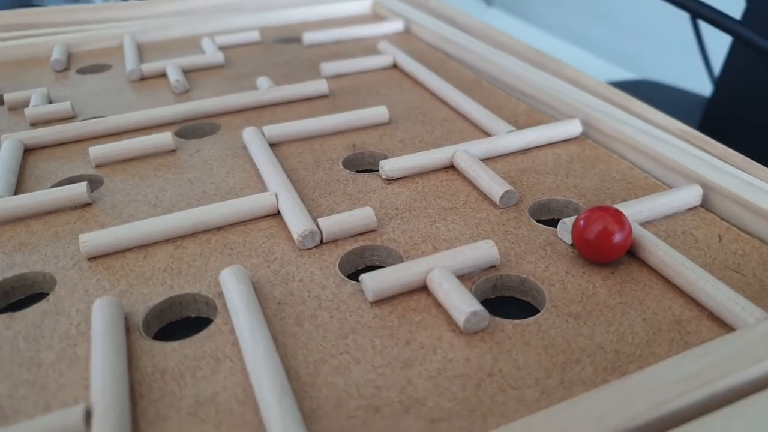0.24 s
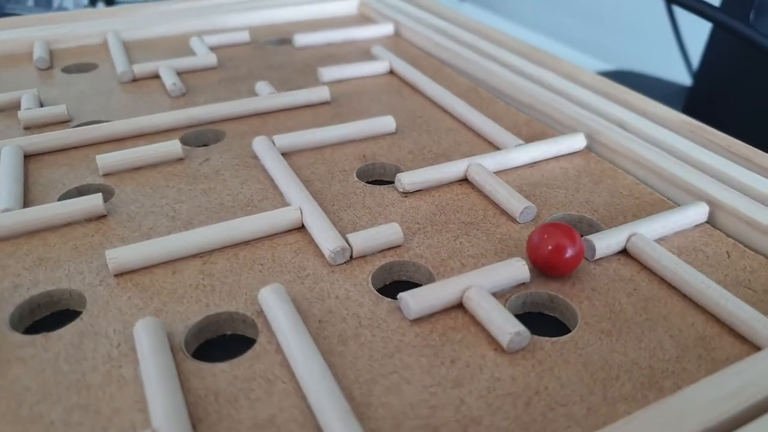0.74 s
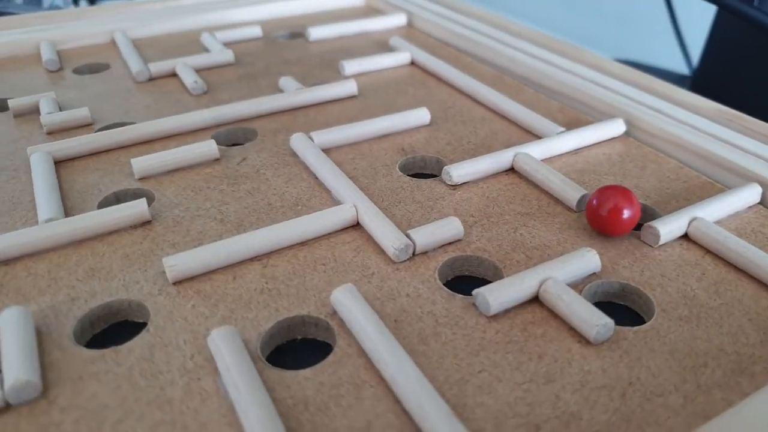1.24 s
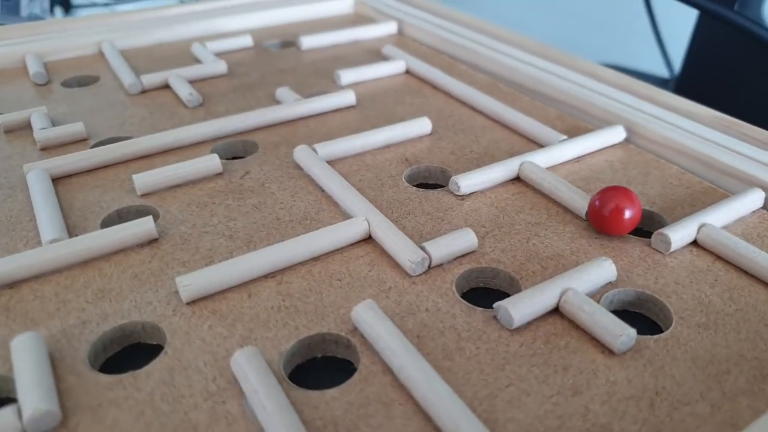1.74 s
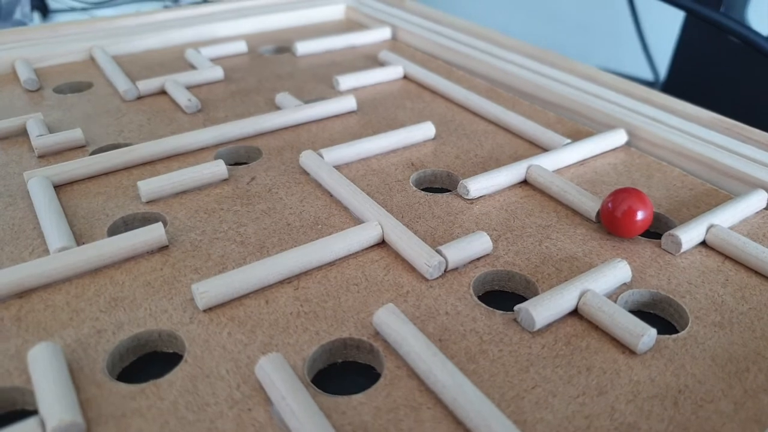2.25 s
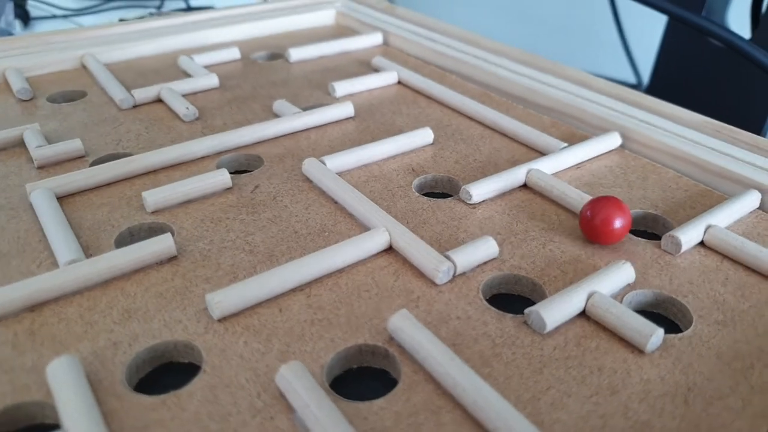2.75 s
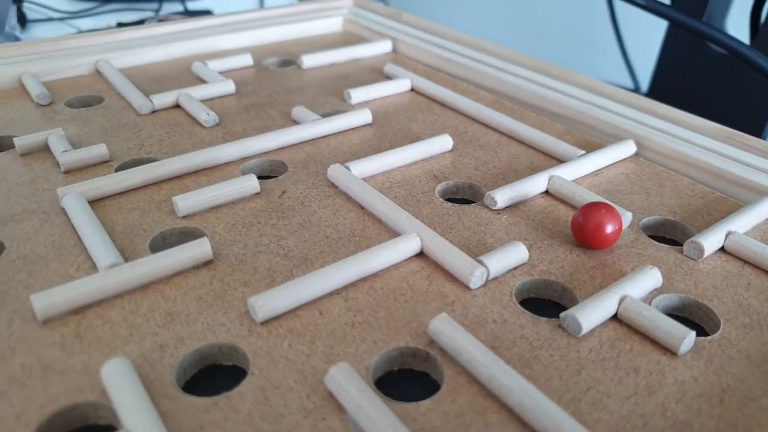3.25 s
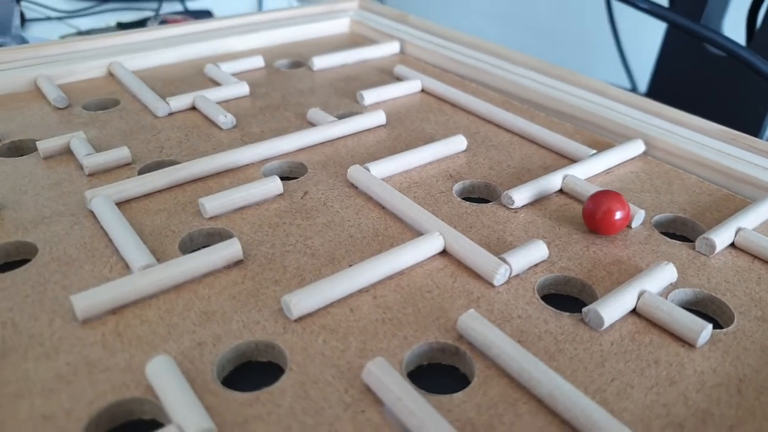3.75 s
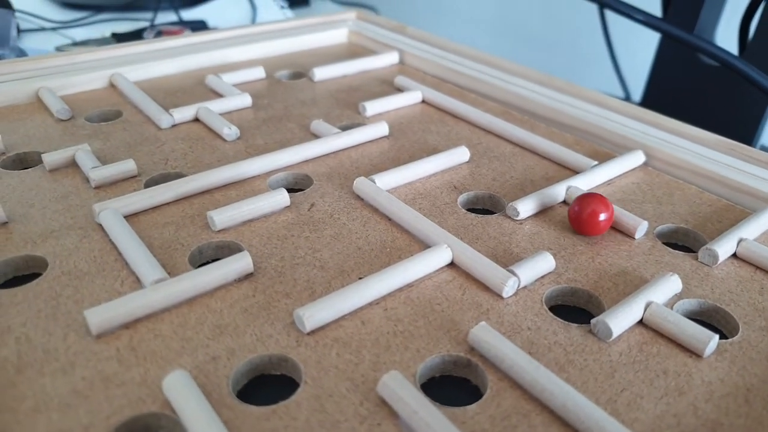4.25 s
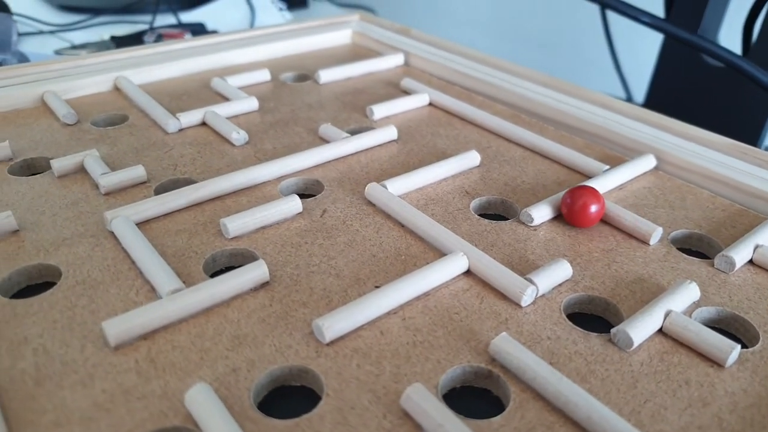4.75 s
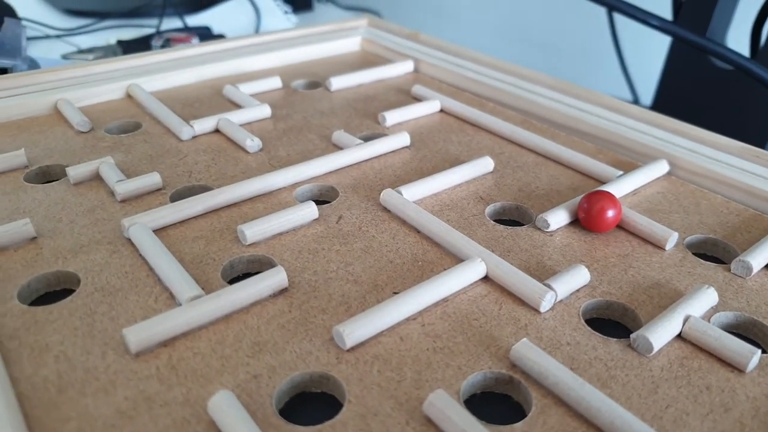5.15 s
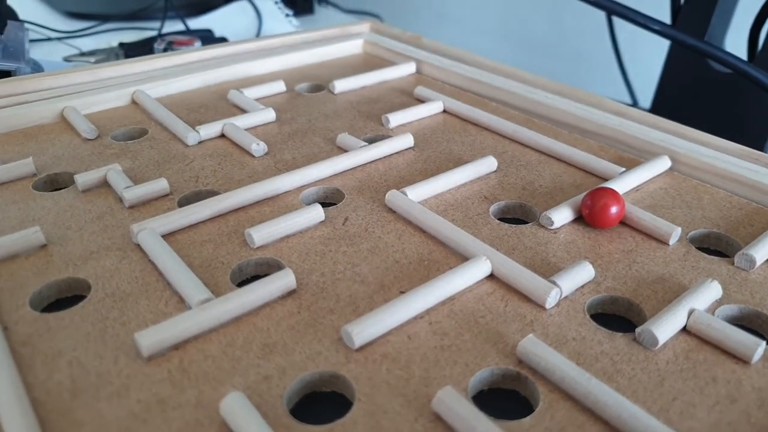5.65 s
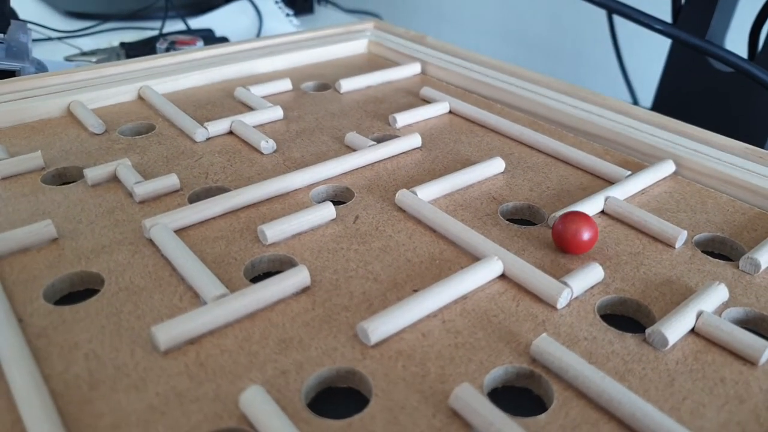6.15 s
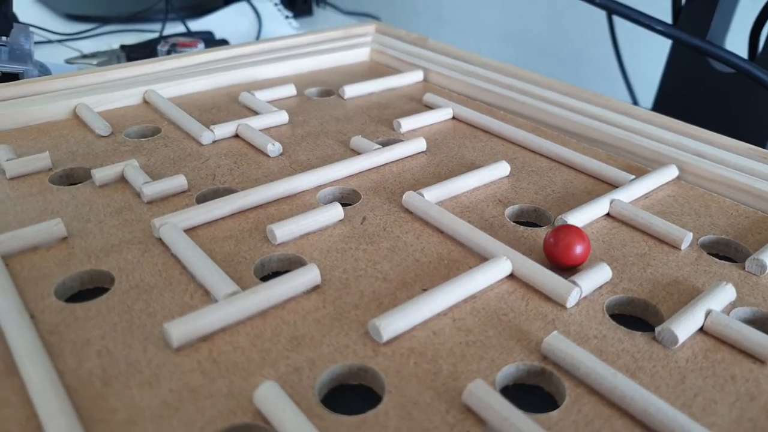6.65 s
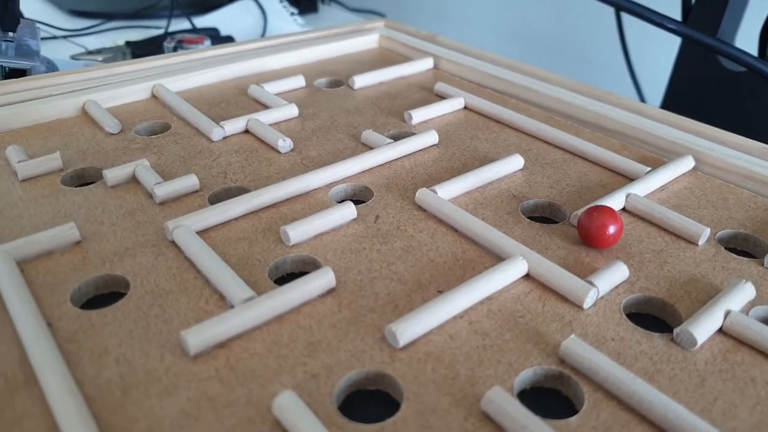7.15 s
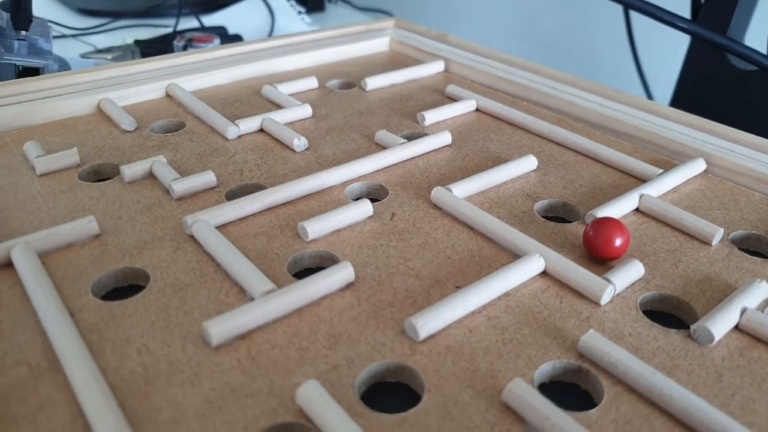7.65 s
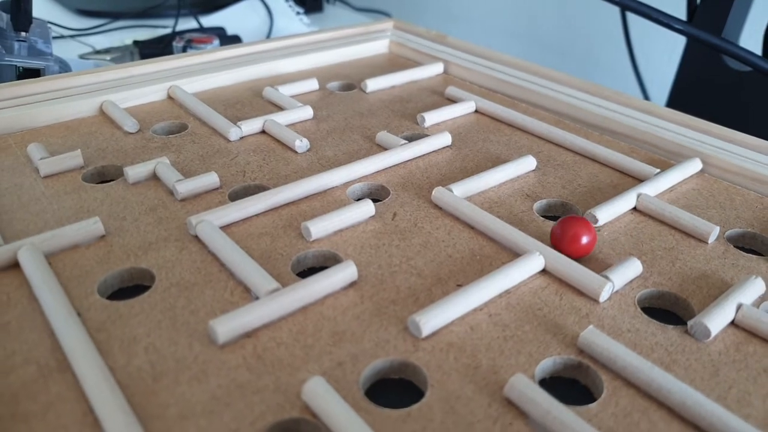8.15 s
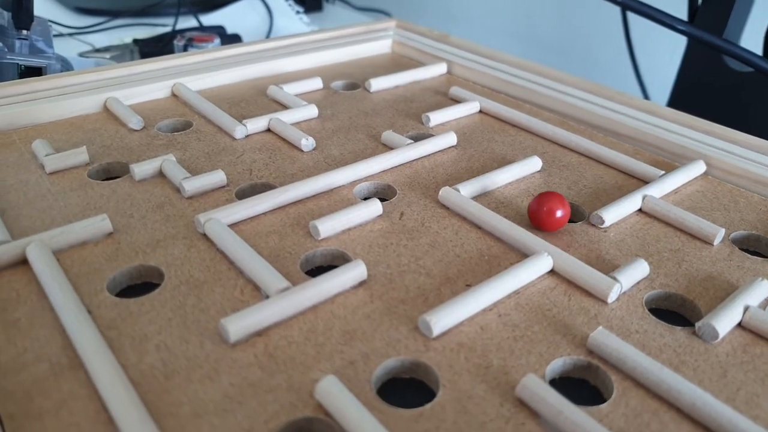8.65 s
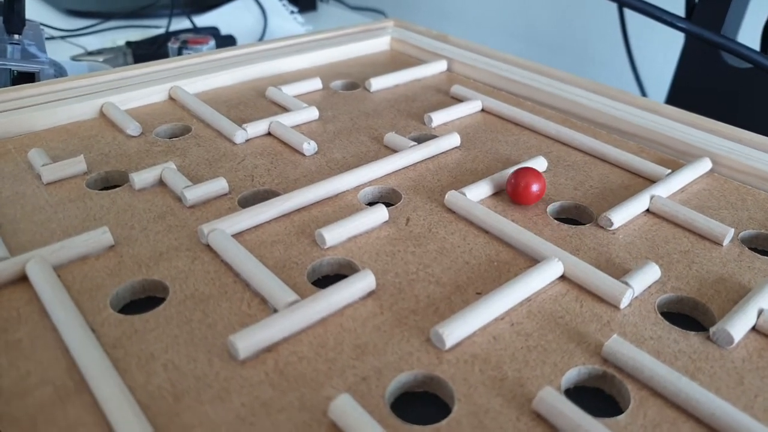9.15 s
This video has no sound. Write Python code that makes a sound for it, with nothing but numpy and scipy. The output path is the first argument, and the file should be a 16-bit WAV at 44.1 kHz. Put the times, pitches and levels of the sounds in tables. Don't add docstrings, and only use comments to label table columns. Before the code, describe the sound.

A close stereo pickup, stronger and brighter on the left, of a motorised wooden maze in a quiet room with low building rumble, faint hiss and short reverberation. A small servo buzzes at once, a raspy tone around 300 hertz chopped into uneven bursts. At 0.5 s both motors zip with gear whine and board rumble; a ball knocks wood at 0.65 and again softly at 0.9. Stuttering buzzes and twitches continue, with a stronger lurch at 2.6 and duller knocks at 3.9 and 4.55. From 4 to 5 s the brighter second motor chatters alone, then the first returns. Larger moves whirr at 5.6 and 6.0. Between 6.3 and 7.5 both buzz almost continuously, with a crisp knock at 6.44 and the hardest at 6.9. Shorter bursts follow, the second motor often alone, until a final whine, rumble and light knock at 9.25, buzzing to about 9.4.

```python
import sys
import numpy as np
from scipy import signal
from scipy.fft import rfft, irfft
from scipy.io import wavfile
from scipy.ndimage import map_coordinates

SR = 44100
rng = np.random.default_rng(int(sys.argv[2]) if len(sys.argv) > 2 else 0)


def boost(x):
    u = np.asarray(x, float) / 20
    return 10 ** u


def transcribe(u):
    v = np.clip(np.atleast_2d(u).T, -1, 1)
    q = np.round(v * 32767).astype(np.int16)
    wavfile.write(sys.argv[1], SR, q)


N = 414522


def rms_one(x):
    return x / np.sqrt(np.mean(x ** 2) + 1e-20)


def at_hz(points, hz):
    points_hz, points_db = np.transpose(points)
    return np.interp(np.log(hz + 1), np.log(points_hz), points_db)


def coloured(x, spectrum, rings=(), size=4096):
    hz = np.arange(size // 2 + 1) * SR / size
    level_db = at_hz(spectrum, hz)
    for centre_hz, width_hz, rise_db in rings:
        level_db = level_db + rise_db / (1 + (2 * (hz - centre_hz) / width_hz) ** 2)
    cepstrum = irfft(np.log(boost(level_db)))
    cepstrum[1:size // 2] *= 2
    cepstrum[size // 2 + 1:] = 0
    response = irfft(np.exp(rfft(cepstrum)))
    return signal.fftconvolve(x, response)[:N]


def drift(rate_hz):
    steps = rng.standard_normal(int(N / SR * rate_hz) + 2)
    return np.interp(np.arange(N) / SR * rate_hz, np.arange(len(steps)), steps)


def butter(x, order, hz, kind="low"):
    return signal.sosfilt(signal.butter(order, hz, kind, fs=SR, output="sos"), x)


def split(x, hz):
    low = butter(x, 2, hz)
    return low, x - low


# frequency in Hz, building rumble and hiss in dB per Hz.
FLOOR_COLOUR = [(28, -37), (42, -12.5), (55, -9.5), (110, -5.5), (170, -15), (240, -20), (490, -28.5),
                (1400, -47.5), (6500, -68), (9000, -58.5), (16000, -39.5)]


def floor():
    hum = [(55.2, 17.7, 12.1)]   # Hz, width Hz, rise dB
    mid, side = (rms_one(coloured(rng.standard_normal(N), FLOOR_COLOUR, hum, size=16384)) for _ in range(2))
    balance_db = np.array([[1.2], [-1.2]])
    return boost(-56.5) * (mid * boost(balance_db) + boost(-13.5) * side * [[1], [-1]])


def reflections(x, t60_s, rise_s, shared_below_hz):
    t = np.arange(int(1.2 * t60_s * SR)) / SR
    mid, side = rng.standard_normal((2, len(t))) * boost(-60 * t / t60_s) * np.clip(t / rise_s, 0, 1)
    side = butter(side, 2, shared_below_hz, "high")
    tails = (mid + side * [[1], [-1]]) / np.sqrt(np.sum(mid ** 2 + side ** 2))
    return signal.fftconvolve(x[None], tails, axes=1)[:, :N]


def placed(x, scatter):
    sides = []
    for lags in ((13, 19, 43), (9, 29, 37)):
        side = x
        for lag in lags:
            echo = np.zeros(lag + 1)
            echo[[0, -1]] = 1, np.clip(scatter, 0, .8)
            side = signal.lfilter(echo[::-1], echo, side)
        sides.append(side)
    return np.array(sides)


def ring(clicks, hz, t60_s):
    radius = boost(-60 / (t60_s * SR))
    angle = 2 * np.pi * hz / SR
    poles = [1, -2 * radius * np.cos(angle), radius * radius]
    return signal.lfilter([0, np.sin(angle)], poles, clicks + 1e-18)


# time in seconds, peak in dB, hardness 0-1.
KNOCKS = [(.6405, -35.5, .4), (.6465, -29, 1), (0.888, -52, 0.3), (.8955, -66, 0.8), (0.9017, -34.5, 0.5),
          (1.464, -54, 0), (2.6335, -50, 0.8), (3.8957, -39, 0.17), (4.5551, -47, 0.4), (4.5631, -30, 0.2),
          (6.4388, -35.5, 0.4), (6.4435, -30, 0.95), (6.889, -33, 0), (6.897, -21, 0.71),
          (9.251, -32.5, 0.64), (9.2546, -61, .6)]
# frequency in Hz, level in dB, t60 in seconds.
BOARD_MODES = [(325, -13, 0.12), (444, -7, 0.07), (593, -18, 0.023), (792, -1, 0.071), (900, 0, 0.022),
               (1179, -3, 0.048), (1383, -4, 0.037), (1554, -12.5, 0.039), (1840, -21, 0.053),
               (2070, -1.5, 0.012), (2720, -3, 0.014), (3140, -7, 0.018)]


def knocks():
    s, peak_db, hardness = np.transpose(KNOCKS)
    spread = rng.standard_normal((len(s), len(BOARD_MODES)))
    out = np.zeros(N)
    for k, (hz, level_db, t60_s) in enumerate(BOARD_MODES):
        tilt_db = 8.5 * (hardness - 1.0) * np.log2(hz / 770)
        clicks = np.zeros(N)
        clicks[(s * SR).astype(int)] = boost(peak_db + level_db + tilt_db + 3.8 * spread[:, k])
        out += ring(clicks, hz, t60_s)
    rebound_s = 0.00537
    out += boost(-2.0) * np.roll(out, int(rebound_s * SR))
    return butter(out, 2, [220, 3500], "band")


def swells(top_s, hold_s, top_db, rise_db_per_s, fall_db_per_s):
    sag_db_per_s = 9.5
    level_db, t = np.full(N, -120.), np.arange(N) / SR
    for s, hold, db in zip(top_s, hold_s, top_db):
        held_s = np.clip(t - s, 0, max(hold, 0))
        rise_db = rise_db_per_s * np.maximum(s - t, 0)
        fall_db = fall_db_per_s * np.maximum(t - s - held_s, 0)
        level_db = np.maximum(level_db, db - rise_db - sag_db_per_s * held_s - fall_db)
    return boost(level_db)


# start in seconds, hold in seconds, gear whine in dB, board rumble in dB,
# lag of the board in seconds.
MOVES = [(.01, 0.16, -43, -49.5, 0.0038), (0.487, .001, -30, -39.5, 0.019), (.695, 0.02, -44, -51, 0.00087),
         (0.9, .05, -50, -56, .001), (1.91, .001, -50, -78, .001), (1.962, .001, -40, -44, 0.0064),
         (2.37, .17, -42.5, -49.5, .01), (2.604, 0.019, -33, -37.5, 0.032),
         (2.792, 0.055, -48, -55.5, 0.019), (5.158, .001, -41, -47.5, 0.0011),
         (5.556, 0.17, -44, -47, .001), (5.971, .001, -30, -36.5, 0.024),
         (6.333, 0.051, -49.5, -53.5, .001), (6.817, .001, -41, -46, 0.00093),
         (8.229, 0.015, -56, -55.5, .001), (9.242, 0.014, -35, -37.5, 0.026)]
# frequency in Hz, level in dB per Hz.
GEAR_COLOUR = [(880, -57), (1500, -22), (2860, -15.5), (4460, -9), (5770, -8), (7030, -22.5), (8240, -22),
               (11800, -14), (14800, -18.5), (16000, -23)]
# frequency in Hz, level in dB per Hz.
RUMBLE_COLOUR = [(50, -32), (90, -10), (165, -9), (240, -3), (310, -2), (400, -8), (520, -20.5),
                 (900, -10.5), (1300, -25), (2000, -35.5), (4000, -80)]


def moves():
    s, hold_s, whine_db, rumble_db, lag_s = np.transpose(MOVES)
    top_s = s + 0.025
    whine = swells(top_s, hold_s, whine_db + 4.5, rise_db_per_s=892, fall_db_per_s=378)
    rumble = swells(top_s + lag_s, hold_s, rumble_db + 8.0, rise_db_per_s=493, fall_db_per_s=219)
    meshing = rng.random(N) < 9000 / SR
    strength = boost(1.8 * np.minimum(rng.exponential(1, N), np.pi))
    teeth = meshing * strength * rng.choice([-1, 1], N)
    gear_rings = [(3770, 600, 10.2), (4550, 600, 8.1)]   # Hz, width Hz, rise dB
    gears = rms_one(coloured(teeth, GEAR_COLOUR, gear_rings))
    board = rms_one(coloured(rng.standard_normal(N), RUMBLE_COLOUR))
    return whine * boost(3.5 * drift(70)) * gears + rumble * boost(1.7 * drift(30)) * board


def motor(case, rings, drive, rattle, uneven_db, patchy_db):
    chop_hz = 301.1
    cycles = np.arange(N) * chop_hz / SR + rng.random() + .06 * drift(30)
    width = np.clip(0.22 + .08 * drift(25), .03, .6)
    number = np.maximum.accumulate(cycles.astype(int) + 1)
    ended = np.maximum.accumulate((cycles - width).astype(int) + 2)
    chance = rng.standard_normal((2, number[-1] + 1))
    skipped = np.where(chance[1] > 1.25, .25, 1)
    strength = (boost(uneven_db * chance[0]) * skipped)[number]
    starts = np.diff(number, prepend=number[0])
    ends = np.diff(ended, prepend=ended[0])
    clicks = rms_one(starts - 0.49 * ends)
    rattling = 0.22 + np.sin(np.pi * (cycles % 1) ** 0.71) ** 2
    shake = rms_one(rng.standard_normal(N) * rattling)
    jolts = strength * (clicks + rattle * shake)
    scale = np.std(coloured(jolts, case, rings))
    low, rest = split(coloured(drive * jolts, case, rings) / scale, 1400)
    middle, high = split(rest, 2500)
    high, top = split(high, 8800)
    out = low * boost(patchy_db * drift(25)) + middle * boost(patchy_db * drift(25))
    return out + high * boost(1.46 * drift(40)) + top * boost(4.2 * drift(30) - 1.5)


def gate(runs, twitches=()):
    coast_mean_s, coast_spread, step_spread_db, step_jitter_s = .013, .25, 1.79, 0.00094
    surge_db, surge_s, twitch_s, run_down_s = 1.5, 0.0018, .005, 0.0037
    drive, chance = np.zeros(N), rng.standard_normal((len(runs), 3, 12))
    for (start, end, steps, level_db), (late, strong, idle) in zip(runs, chance):
        steps = round(steps)
        step_s = (end - start) / steps
        for k in range(steps):
            s = start + k * step_s + step_jitter_s * late[k] * (k > 0)
            coast_s = coast_mean_s * np.exp(coast_spread * idle[k] * (k < steps - 1.5))
            off_s = start + (k + 1) * step_s - min(coast_s, step_s / 2)
            on = np.arange(int(s * SR), min(int(off_s * SR), N))
            surge = surge_db * np.exp(-(on / SR - s) / surge_s)
            drive[on] = boost(level_db + step_spread_db * strong[k] * (steps > 1.5) + surge)
    for s, level_db in twitches:
        drive[int(s * SR):int((s + twitch_s) * SR)] = boost(level_db)
    slowing = np.arange(N) / SR / run_down_s
    return np.exp(np.maximum.accumulate(np.log(drive + 1e-9) + slowing) - slowing)


# start in seconds, end in seconds, equal steps,
# level in dB.
FIRST_RUNS = [(.021, .255, 1, -42.5), (.783, .855, 2, -48), (.88, 1.11, 6, -42.5), (1.22, 1.3, 2, -47),
              (1.414, 1.475, 2, -46), (1.507, 1.598, 1, -44), (1.606, 1.69, 2, -43.5),
              (1.722, 1.79, 2, -45), (1.809, 1.955, 4, -49.5), (1.956, 2.06, 1, -43), (2.118, 2.19, 2, -51),
              (2.315, 2.385, 2, -48), (2.375, 2.585, 1, -45), (2.813, 2.96, 1, -45), (3.041, 3.135, 2, -52),
              (3.184, 3.22, 1, -53.5), (3.238, 3.304, 2, -47.5), (3.321, 3.356, 1, -46.5),
              (3.434, 3.472, 1, -50), (3.651, 3.77, 3, -43.5), (3.826, 3.9, 2, -44.5),
              (4.325, 4.356, 1, -46.5), (5.009, 5.165, 4, -46), (5.166, 5.24, 1, -42),
              (5.439, 5.51, 2, -50.5), (5.812, 5.885, 4, -50), (5.985, 6.096, 1, -40),
              (6.106, 6.205, 2, -47), (6.222, 6.297, 1, -47), (8.723, 8.805, 2, -47.5)]
SECOND_RUNS = [(3.989, 4.056, 2, -45), (4.062, 4.183, 1, -42.5), (4.242, 4.302, 2, -41.5),
               (4.438, 4.535, 3, -43), (4.574, 4.61, 1, -44.5), (4.653, 5.0, 9, -46), (7.555, 7.71, 2, -41),
               (7.757, 7.895, 4, -43), (8.081, 8.17, 2, -41), (8.392, 8.462, 2, -45.5),
               (8.473, 8.535, 2, -46), (9.022, 9.05, 1, -45), (9.066, 9.128, 2, -44),
               (9.203, 9.265, 2, -46.5)]
JOINT_RUNS = [(.407, .474, 2, -43), (.487, .59, 1, -40), (.587, .633, 1, -43), (.638, .776, 1, -42.5),
              (1.127, 1.2, 2, -41.5), (2.608, 2.716, 1, -38.5), (2.72, 2.8, 2, -46), (3.497, 3.57, 2, -46),
              (5.558, 5.778, 1, -40.5), (5.933, 5.995, 2, -43.5), (6.296, 6.414, 3, -41.5),
              (6.404, 6.514, 1, -46), (6.559, 6.68, 1, -44.5), (6.674, 6.772, 2, -42),
              (6.766, 6.855, 1, -42.5), (6.86, 7.005, 1, -41.5), (7.001, 7.123, 1, -44),
              (7.174, 7.238, 1, -41.5), (7.237, 7.326, 2, -41), (7.337, 7.44, 3, -44),
              (7.443, 7.553, 1, -40), (7.893, 8.081, 3, -43.5), (8.229, 8.263, 1, -44),
              (8.261, 8.33, 1, -44.5), (8.564, 8.68, 3, -44.5), (8.883, 8.98, 3, -47),
              (9.254, 9.41, 3, -40.5)]
# time in seconds, level in dB.
TWITCHES = [(0.015, -49), (0.263, -49), (.757, -51), (2.791, -40), (2.974, -49.5), (3.361, -50.5),
            (3.784, -47), (4.358, -46), (4.623, -46), (5.278, -49.5), (5.331, -53.5), (8.177, -44.5),
            (8.27, -41.5), (5.915, -51), (6.86, -40)]
# frequency in Hz, level in dB per Hz.
FIRST_CASE = [(90, -32), (200, -21.5), (520, -34), (800, -22), (1500, -30.5), (2600, -32.5), (3700, -25.5),
              (5800, -27), (6800, -15), (7700, -26.5), (8600, -37), (12000, -39), (16000, -45.5)]
SECOND_CASE = [(90, -46), (200, -22), (420, -6.5), (550, -21.5), (1300, -26), (2600, -11), (4000, -15),
               (5800, -9.5), (6800, -3.5), (7700, -11), (8700, -27.5), (12000, -24.5), (16000, -32.5)]
# frequency in Hz, width in Hz, rise in dB.
FIRST_RINGS = [(312.4, 170, 12.5), (780, 50, 10.5), (941.6, 55, 12.5), (1306, 21, 15), (2147.6, 174, 17.5),
               (5275, 440, 6.5)]
SECOND_RINGS = [(270, 76, 14.4), (955, 280, 15.5), (2696, 26, 6.3), (3760, 170, 10.3), (4930, 100, 5.6)]


def motors():
    joint = gate(JOINT_RUNS) * np.sqrt(.5)
    first_drive = gate(FIRST_RUNS, TWITCHES) + joint
    second_drive = gate(SECOND_RUNS) + joint
    first = motor(FIRST_CASE, FIRST_RINGS, first_drive, rattle=1.0, uneven_db=3.0, patchy_db=1.47)
    second = motor(SECOND_CASE, SECOND_RINGS, second_drive, rattle=1.0, uneven_db=2.0, patchy_db=-1.95)
    return boost(3) * placed(first, scatter=0.83) + boost(-0.5) * placed(second, scatter=0.81)


# time in seconds, turn about -1 to 1.
TURN = [(0, -1.2), (1.5, -0.88), (3.2, -0.5), (3.6, -0.44), (5, 0.45), (7, 0.32), (9.4, 0.81)]
# low edge in Hz, high edge in Hz, change in dB.
TURNING_LOBES = [(2000, 2860, 2), (3640, 3830, 0), (4270, 4670, -3.5)]


def turned(near):
    s, turn = np.transpose(TURN)
    turn = np.interp(np.arange(N) / SR, s, turn)
    for low_hz, high_hz, full_db in TURNING_LOBES:
        lobe = butter(near, 1, [low_hz, high_hz], "band")
        near = near + (boost(full_db * turn + 1.47 * drift(12)) - 1) * lobe
    return near


# frequency in Hz, left over right in dB.
LEFT_OVER_RIGHT = [(60, 9.4), (300, 5.55), (700, 6.7), (1200, 8.2), (2400, 5.7), (4400, 11.7), (8000, 20),
                   (15000, 13)]


def scene():
    near = turned(motors() + placed(moves(), scatter=0.39)) + knocks()
    below, above = split(near[0], 2940)
    to_room = boost(1) * below + above
    room_db = np.array([[-15], [-6.0]])
    left, right = near + boost(room_db) * reflections(to_room, t60_s=0.33, rise_s=0.0026, shared_below_hz=710)
    high = butter(right, 3, 1500, "high")
    low = right - high
    lag_samples = SR * 0.0003055 * (1 + 0.48 * drift(4))
    high = map_coordinates(high, [np.arange(N) - lag_samples], order=3)
    shade = [(hz, -level_db) for hz, level_db in LEFT_OVER_RIGHT]
    return np.array([left, coloured(low + high, shade)]) + floor()


def low_pass(x):
    return signal.sosfilt(signal.butter(12, 16300, fs=SR, output="sos"), x)


def record(dry):
    mix = signal.sosfilt(signal.cheby2(10, 60, 16500, fs=SR, output="sos"), dry)
    return low_pass(mix)


dry = scene()
out = record(dry)
transcribe(out)
```